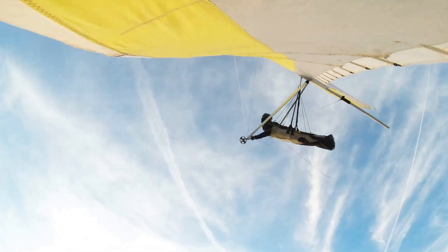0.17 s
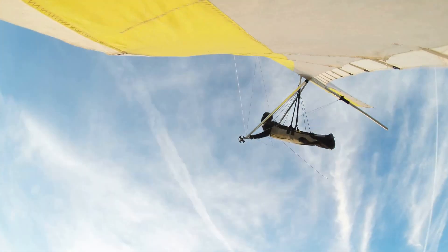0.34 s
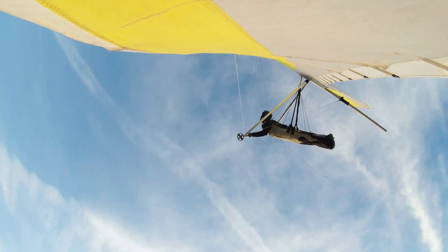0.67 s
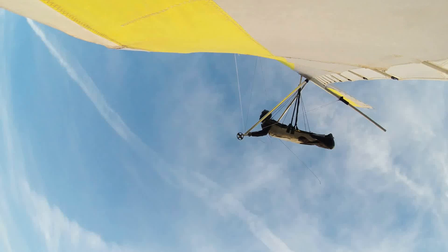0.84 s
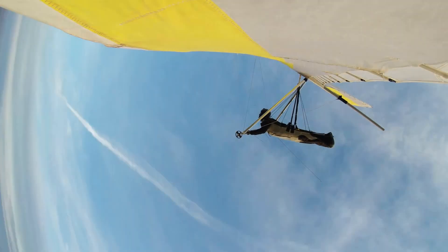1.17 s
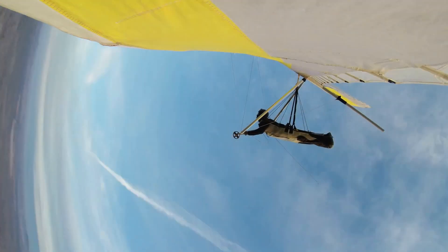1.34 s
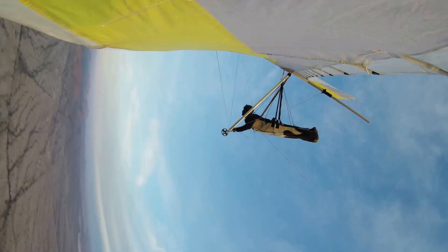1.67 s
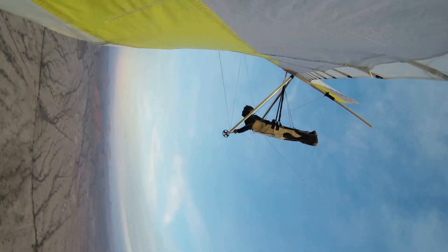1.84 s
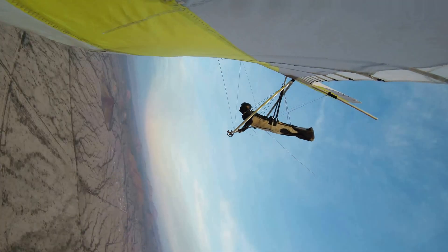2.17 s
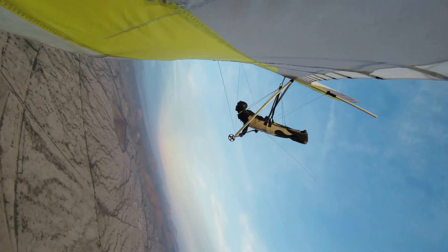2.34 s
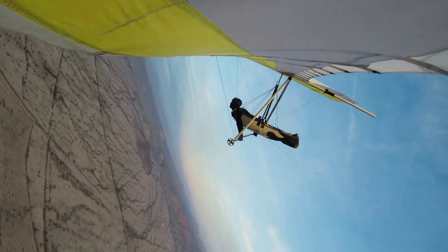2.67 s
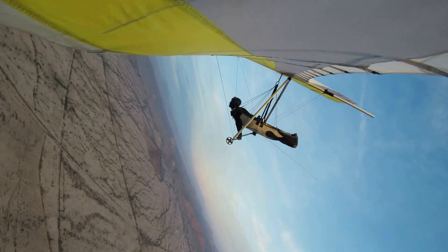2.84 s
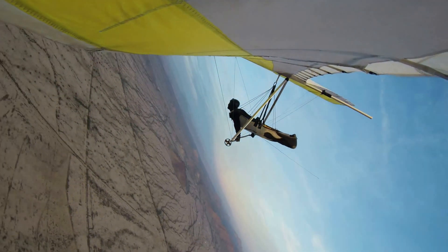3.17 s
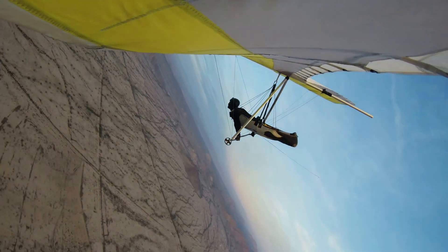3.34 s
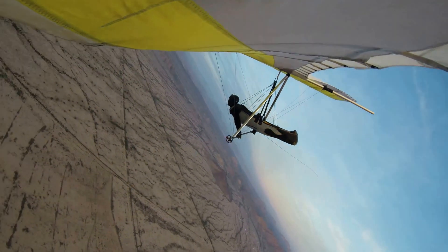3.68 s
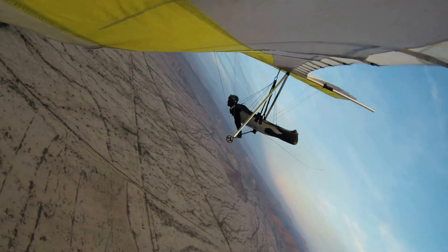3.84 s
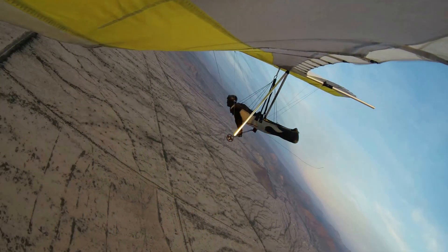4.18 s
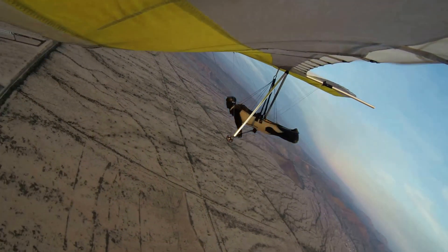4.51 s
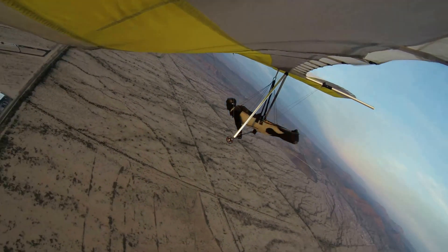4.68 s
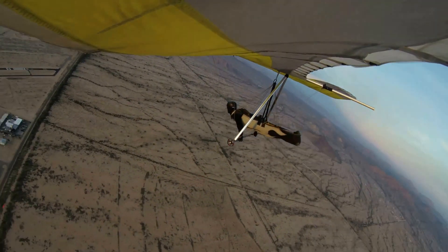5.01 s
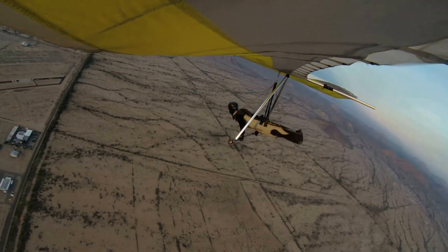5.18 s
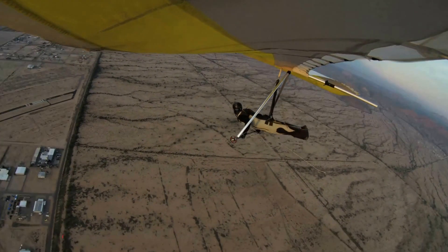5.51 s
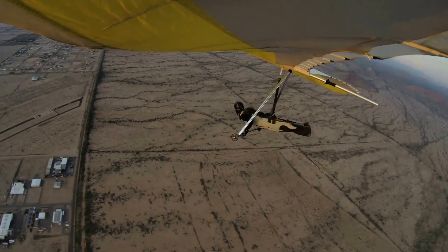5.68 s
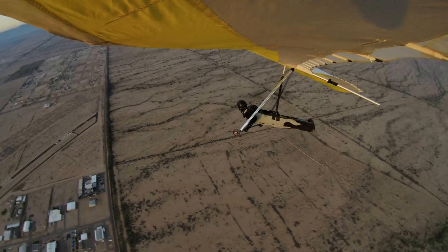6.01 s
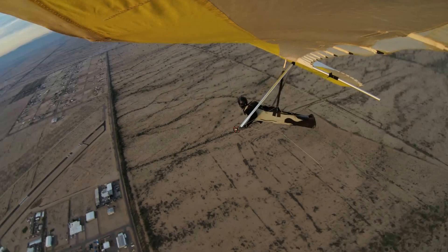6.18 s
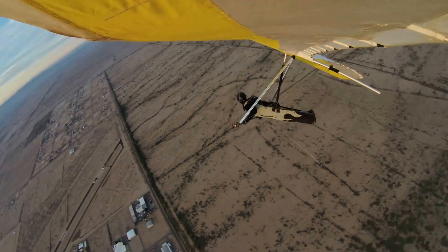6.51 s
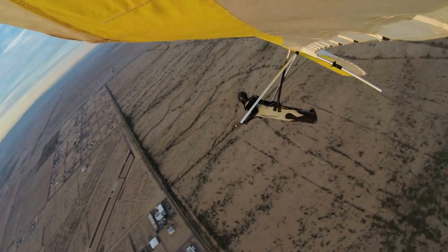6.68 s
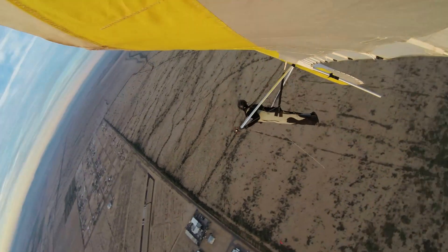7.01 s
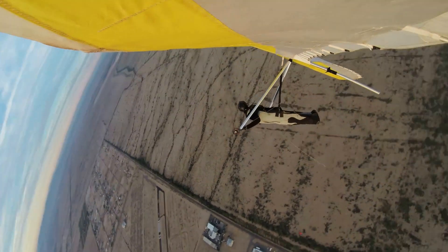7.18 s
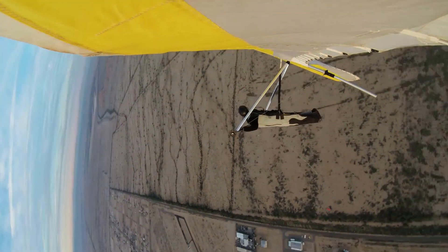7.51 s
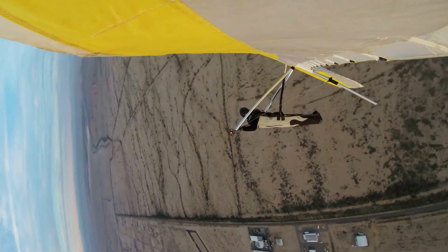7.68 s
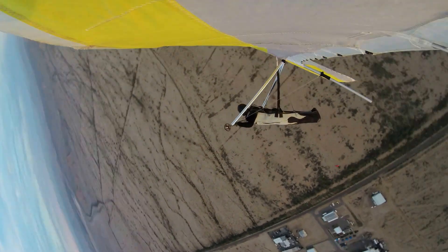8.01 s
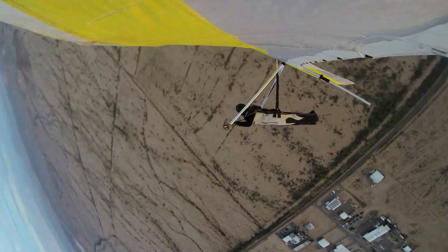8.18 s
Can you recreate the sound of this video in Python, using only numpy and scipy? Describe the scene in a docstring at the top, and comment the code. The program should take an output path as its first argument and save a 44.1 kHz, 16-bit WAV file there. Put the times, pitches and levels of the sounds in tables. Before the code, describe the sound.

Wind rushes over a camera mounted on a hang glider wing throughout, a bright hiss on top of deep buffeting and an uneven low throb. From the start the rush fades, reaching its softest at about 1 second as the glider slows. It then builds quickly, and between about 1.3 and 1.8 seconds the wires give a few faint, short, rising whistles. By 2 seconds the air is loud and full, with a stronger gust around 2.3 to 2.9 seconds. From roughly 2.7 to 6.5 seconds the wing adds a low drone that swells and eases under the steady stream, with small flutters and brief dips in the hiss. The drone recedes after 7 seconds. The rush slackens slightly near 7.6 seconds, then surges again with a deep rumble just after 8 seconds.

```python
"""Hang glider turning and diving

Air rushes over a camera on the wing as the glider slows over the top of a steep turn and dives out.
The stream hisses through the housing, buffets the mount and sets the wing droning. Eddies shed by a tube
throb at a rate that follows the airspeed, the rigging whistles briefly, and a limiter holds thumps down."""
import sys
import numpy as np
from scipy.fft import rfft, irfft, next_fast_len
from scipy.io import wavfile
from scipy.ndimage import uniform_filter1d, minimum_filter1d, map_coordinates

SR = 44100
rng = np.random.default_rng(int(sys.argv[2]) if len(sys.argv) > 2 else 0)


def log_audio(samples):
    """Write samples as a 16-bit WAV file to the path given in sys.argv[1]."""
    # one column per channel
    frames = np.atleast_2d(samples).T
    # limit to full scale, then quantise
    limited = np.clip(frames, -1, 1)
    pcm = np.round(limited * 32767).astype(np.int16)
    wavfile.write(sys.argv[1], SR, pcm)


N = 367794


def amp(db):
    """Decibels to gain."""
    return 10 ** (np.asarray(db) / 20)


def unit(x):
    """Scale to rms 1."""
    return x / np.sqrt(np.mean(np.abs(x) ** 2) + 1e-20)


def curves(rows):
    """One value per sample for each column after the time."""
    times_s, *columns = np.transpose(rows)
    return [np.interp(np.arange(N) / SR, times_s, column) for column in columns]


def wobble(knots_per_s):
    """Smooth random curve."""
    knots = rng.standard_normal(N // 20)
    return map_coordinates(knots, [np.arange(N) * knots_per_s / SR], mode="wrap")


def filtered(x, response):
    """Apply a gain given as a function of Hz."""
    size = next_fast_len(N + SR // 2)
    return irfft(rfft(x, size) * response(np.fft.rfftfreq(size, 1 / SR)), size)[:N]


def noise(response):
    """Noise of rms 1 with the given response."""
    return unit(filtered(rng.standard_normal(N), response))


def below(f, edge_hz, order):
    """Low-pass gain."""
    return 1 / np.sqrt(1 + (f / edge_hz) ** (2 * order))


def above(f, edge_hz, order):
    """High-pass gain."""
    return np.sqrt(1 - below(f, edge_hz, order) ** 2)


def colour(spectrum, resonances, f):
    """Gain of a smooth spectrum with broad resonances on top."""
    hz, db = np.transpose(spectrum)
    lift_db = sum(lift * np.exp(-2 * ((f - centre) / width) ** 2) for centre, width, lift in resonances)
    return amp(np.interp(np.log(f + 1), np.log(hz), db, left=-120, right=-120) + lift_db)


def saturated(x, share, memory_s):
    """Evens out the swells of a shaking part, so its level holds steadier."""
    power = np.abs(uniform_filter1d(x ** 2, int(memory_s * SR))) + 0.022
    return unit(x / power ** (share / 2))


# Gusts (+) and lulls (-). Each row: start in seconds, length in seconds, change in dB.
GUSTS = [(1.42, 0.69, 1.5), (2.31, 0.55, 3.5), (3.197, 0.26, 1), (3.45, 0.064, -3.5), (3.78, .11, -3),
         (5.09, 0.04, 3.5), (5.924, 0.037, 2), (6.45, 1.0, -1.2), (7.53, 0.17, -1.5), (7.75, 0.67, 1),
         (8.07, 0.054, 2)]

def gusts(attack_s=0.021, release_s=0.047):
    """Change of the stream in dB: each gust or lull sets in fast, holds and lets go."""
    change_db = np.zeros(N)
    for start_s, length_s, db in GUSTS:
        end_s = start_s + max(length_s, attack_s)
        change_db += curves([(start_s, 0), (start_s + attack_s, db), (end_s, db), (end_s + release_s, 0)])[0]
    return change_db


# Spectrum of the rushing air. Each row: frequency in Hz, density in dB.
RUSH_SPECTRUM = [(500, -32), (800, -12), (1100, -16), (1400, -13.5), (2100, -7), (3550, -2.5), (3780, -16),
                 (5300, -25.5), (6500, -19.5), (7100, -30.5), (9600, -41.5), (11200, -43), (15200, -47.5)]
# Housing resonances. Each row: centre in Hz, width in Hz, lift in dB.
HOUSING_RESONANCES = [(1409, 210, 8), (1670, 180, 3.5), (2419, 310, 7), (2801, 133, 5.5), (3400, 68, 1.5),
                      (3900, 83, 4.5), (4500, 180, 5), (4894, 270, 9), (5500, 450, 5.5), (6120, 270, 6.0),
                      (8970, 700, 5.5), (10290, 800, 12.5), (12510, 1270, 6.2)]

def housing(f):
    """Colour of moving air heard through the camera's case."""
    return colour(RUSH_SPECTRUM, HOUSING_RESONANCES, f)


# Spectra of buffet and rumble. Each row: frequency in Hz, density in dB.
BUFFET_SPECTRUM = [(8, -20), (25, -2.5), (36, 2), (53, -1), (75, 0.5), (105, -5.5), (150, -6.5), (230, -26),
                   (300, -45)]
RUMBLE_SPECTRUM = [(150, -42), (230, 5.5), (260, 2.5), (300, -1.5), (410, -7.5), (600, -7), (900, -6),
                   (1100, -16.5), (1500, -47)]
# Resonances in the rumble. Each row: centre in Hz, width in Hz, lift in dB.
RUMBLE_RESONANCES = [(355, 30, 6), (750, 90, 7)]
# Roar, the low edge of the rush. Each row: time in seconds, level in dB.
ROAR_LEVELS = [(0, -39), (.7, -43), (1.2, -35.5), (1.6, -31), (2.05, -27.5), (3.1, -30), (3.8, -31.5),
               (5.6, -32.5), (6.1, -35), (6.8, -30.5), (8.34, -30)]
# Air layers by name. Each row: steady-flight level in dB, then dB per dB of flow, of load, of gust.
AIR_LAYERS = {"buffet": (-21, 0.2, 0.36, 0.43), "rumble": (-34.5, 0.1, 0.86, 0.3),
              "hollow": (-38, 0.6, .38, 0.3), "rush": (-26.8, 0.45, 0.05, 1.13),
              "sizzle": (-40.5, 0.76, 0.04, .65), "hiss": (-53, 1.18, -0.16, .25)}

def air(flow_db, load_db):
    """Buffeting on the case; above it, noise bands that flutter with the same turbulence."""
    gust_db = gusts()
    gain = {name: amp(db + by_flow * flow_db + by_load * load_db + by_gust * gust_db)
            for name, (db, by_flow, by_load, by_gust) in AIR_LAYERS.items()}
    gain["roar"] = amp(curves(ROAR_LEVELS)[0] + 0.57 * gust_db)
    flutter_db = 0.66 * wobble(10) + 0.5 * wobble(28) + 0.55 * wobble(90) + 0.81 * wobble(320)
    buffet = saturated(noise(lambda f: colour(BUFFET_SPECTRUM, [], f)), share=0.66, memory_s=0.11)
    bands = {"rumble": lambda f: colour(RUMBLE_SPECTRUM, RUMBLE_RESONANCES, f) * below(f, 490, order=6),
             "hollow": lambda f: colour(RUMBLE_SPECTRUM, RUMBLE_RESONANCES, f) * above(f, 526, order=6),
             "roar": lambda f: housing(f) * above(f, 990, order=6) * below(f, 1840, order=6),
             "rush": lambda f: housing(f) * above(f, 1630, order=6) * below(f, 4060, order=10),
             "sizzle": lambda f: housing(f) * above(f, 3896, order=24) * below(f, 6840, order=14),
             "hiss": lambda f: housing(f) * above(f, 6950, order=20)}
    stream = sum(gain[name] * noise(band) for name, band in bands.items())
    return gain["buffet"] * buffet + amp(flutter_db) * stream


# Frame swells. Each row: resonance name, middle in seconds, length in seconds, lift in dB.
SURGES = [("mount", 1.546, 0.31, 5), ("mount", 2.308, 1, 6.7), ("mount", 3.75, .3, 4.2),
          ("mount", 5.3, .4, 3.5), ("mount", 7.42, 0.6, 6.3), ("mount", 8.17, 0.34, 12.7),
          ("lower wing", 2.78, 0.66, 4.1), ("lower wing", 3.37, 0.26, 8.9), ("lower wing", 3.79, .4, 5.9),
          ("lower wing", 4.55, .45, 5), ("upper wing", 3.15, 0.65, 3.04), ("upper wing", 4.17, 0.32, 4.2),
          ("upper wing", 6.02, 0.92, 4.7)]

def surges(resonance):
    """Lift in dB as one resonance catches the turbulence, a smooth arch each time."""
    t = np.arange(N) / SR
    return sum(db * np.cos(np.pi * np.clip((t - middle_s) / length_s, -.5, .5))
               for name, middle_s, length_s, db in SURGES if name == resonance)


# Mount and wing resonances by name.
# Each row: centre in Hz, width in Hz, level in dB, dB per dB of flow, dB per dB of load.
FRAME_RESONANCES = {"mount": (64.1, 5, -22, 0.23, 0.04), "lower wing": (174, 8.5, -23, 0.15, .68),
                    "upper wing": (213, 14.5, -22.5, -0.13, 1.0)}

def frame(flow_db, load_db):
    """The stream rings the mount and the load makes the wing drone; each resonance swells on its own."""
    out = np.zeros(N)
    for name, (hz, width_hz, db, by_flow, by_load) in FRAME_RESONANCES.items():
        def response(f):
            ringing = f * width_hz / np.hypot(hz * hz - f * f, f * width_hz)
            return ringing * above(f, 0.67 * hz, order=5) * below(f, 1.118 * hz, order=10)
        swing = saturated(noise(response), share=0.42, memory_s=0.1)
        level_db = db + by_flow * flow_db + by_load * load_db + surges(name) + 0.9 * wobble(9)
        out += amp(level_db) * swing
    return out


# Eddy shedding. Each row: time in seconds, rate in Hz, level in dB.
SHEDDING = [(0, 40.64, -17), (.45, 39, -13.5), (.75, 37.35, -24.5), (1.2, 35.4, -27), (1.7, 37.5, -16),
            (2.2, 35.46, -16), (3.3, 43.23, -21), (5.5, 46, -19), (6.4, 42.6, -19.5), (7.1, 41.57, -21.5),
            (7.8, 39.3, -16.5), (8.34, 33.85, -21)]
# Its harmonics. Each row: multiple of the rate, relative level in dB.
SHEDDING_HARMONICS = [(1, -4.5), (2, -2), (4, -18.5), (5, -7.5)]

def eddies():
    """A tube sheds eddies in an unsteady throb; the upper harmonics grow with airspeed."""
    rate_hz, level_db = curves(SHEDDING)
    phase = 2 * np.pi * np.cumsum(rate_hz * (1 + 0.0117 * wobble(16))) / SR
    relative_speed = rate_hz / rate_hz.max()
    throb = np.zeros(N)
    for multiple, db in SHEDDING_HARMONICS:
        gain = amp(db + 2.06 * wobble(12)) * relative_speed ** (1.1 * (multiple - 1))
        throb += gain * np.sin(multiple * phase + 0.52 * wobble(18))
    return amp(level_db + 1.5) * throb


# Wire whistles. Each row: start in seconds, length in seconds, start in Hz, end in Hz, peak in dB.
WHISTLES = [(1.26, .17, 2410, 2670, -32), (1.4, .14, 3220, 3470, -27), (1.46, .12, 2730, 2900, -26),
            (1.55, .2, 3510, 3720, -33), (1.15, 1.3, 7630, 7620, -59)]

def rigging(glide_bend=0.88, shake_share=0.0182):
    """Wires whistle as the air speeds up. The short whistles glide up; turbulence shakes every pitch."""
    t, out = np.arange(N) / SR, np.zeros(N)
    for start_s, length_s, start_hz, end_hz, db in WHISTLES:
        progress = np.clip((t - start_s) / length_s, 0, 1)
        glide_hz = start_hz + (end_hz - start_hz) * progress ** glide_bend
        hz = glide_hz * (1 + shake_share * wobble(500))
        out += amp(db) * np.sin(np.pi * progress) * np.sin(2 * np.pi * np.cumsum(hz) / SR)
    return out


# Stream, weak atop the turn, building in the dive. Each row: time in seconds, dB re steady flight.
AIRFLOW = [(0, -4), (.3, -5.5), (.93, -12.5), (1.28, -7.5), (1.6, -3), (2.1, 2), (2.6, 0.5), (3.3, 0.5),
           (3.7, -0.5), (5.7, .5), (6.1, -1.3), (7.1, 2), (7.6, -1), (8.1, 3.5), (8.34, 1)]
# Wing load; the unloaded wing goes quiet. Each row: time in seconds, dB re steady flight.
WING_LOAD = [(0, 1.5), (.42, -3), (.65, -11.5), (1.2, -13.5), (1.55, -8.5), (2.1, -5), (2.75, 2.5),
             (3.7, 1.5), (5.6, 1), (7.1, -3), (7.6, -9.5), (8.34, -8)]

def scene():
    """Flow and load drive the air and the frame; eddies and rigging join them at one microphone."""
    (flow_db,), (load_db,) = curves(AIRFLOW), curves(WING_LOAD)
    return (air(flow_db, load_db) + frame(flow_db, load_db) + eddies() + rigging())[None]


def limited(x, ceiling_db, hold_s):
    """Peaks over the ceiling briefly duck the whole sound."""
    needed_gain = np.minimum(1, amp(ceiling_db) / (np.abs(x) + 1e-9))
    span = int(hold_s * SR)
    return x * uniform_filter1d(minimum_filter1d(needed_gain, span), span)


def record(dry):
    """The camera limits peaks and bandwidth; both ends fade."""
    fade_s, top_hz = 0.003, 15150
    from_end = np.minimum(np.arange(N), np.arange(N)[::-1])
    fade = np.minimum(1, from_end / (fade_s * SR))
    held = limited(dry[0], ceiling_db=-2, hold_s=0.015)
    return filtered(fade * held, lambda f: f < top_hz)[None]


dry = scene()
out = record(dry)
log_audio(out)
```